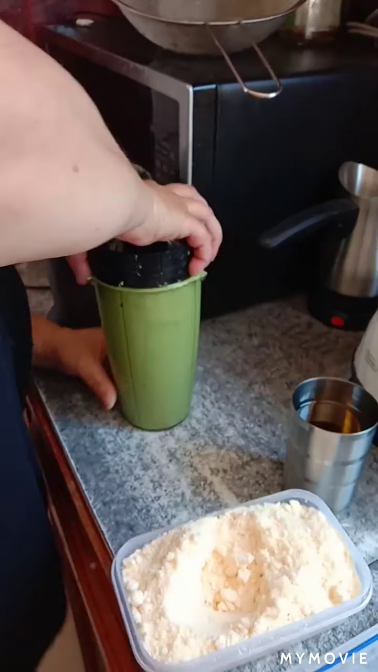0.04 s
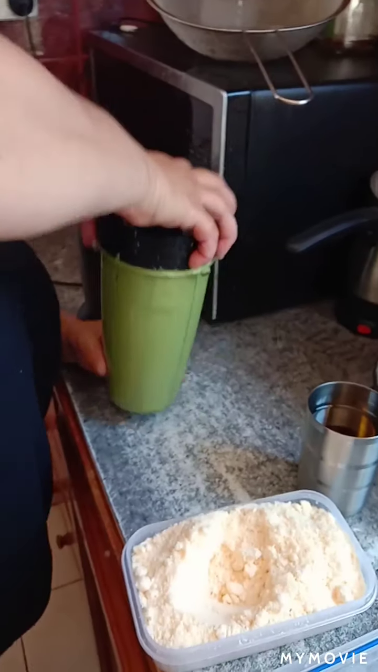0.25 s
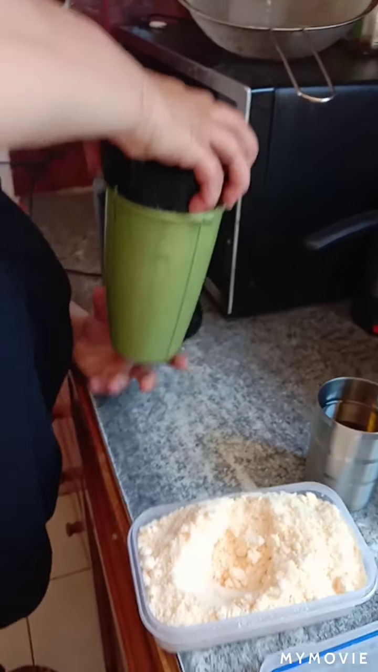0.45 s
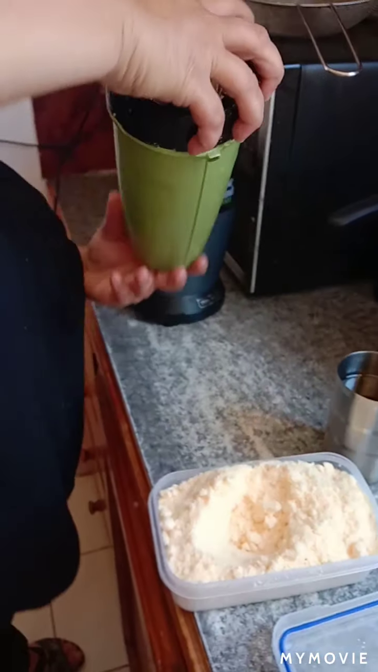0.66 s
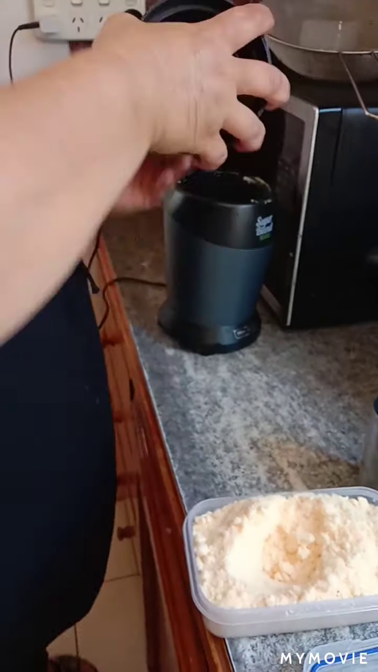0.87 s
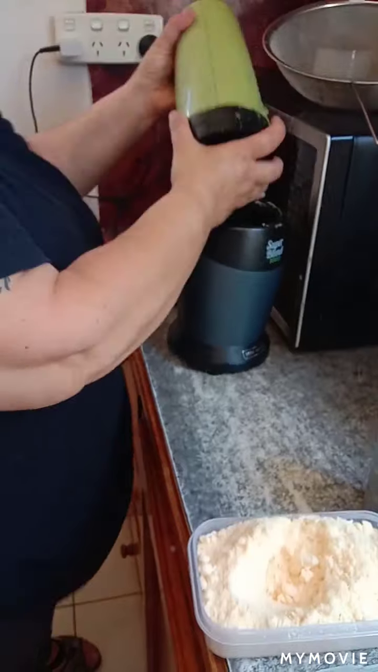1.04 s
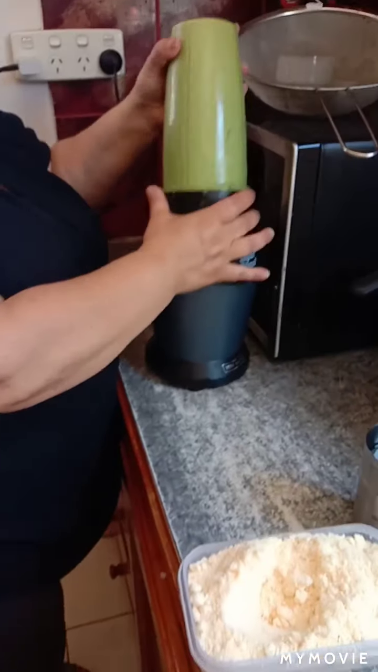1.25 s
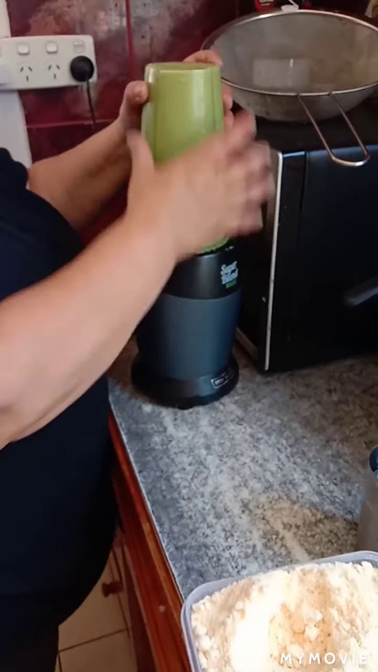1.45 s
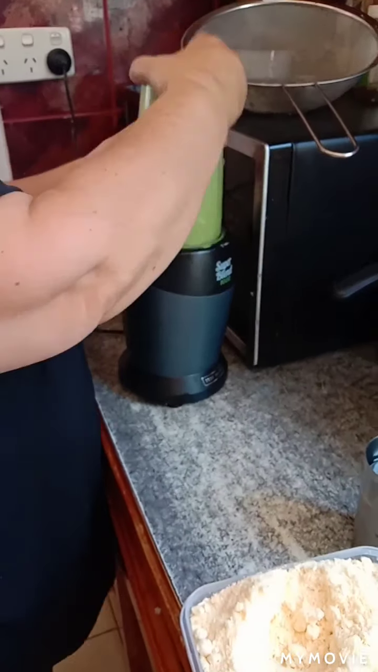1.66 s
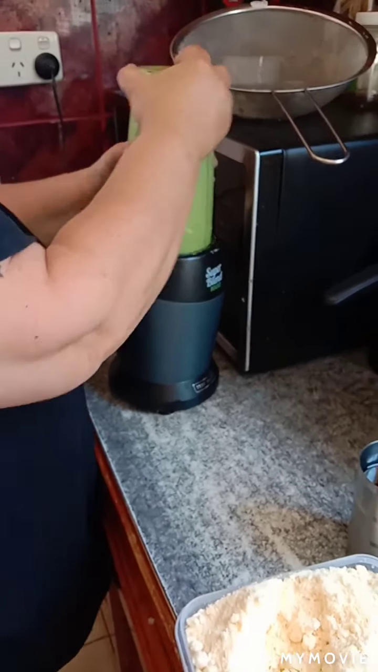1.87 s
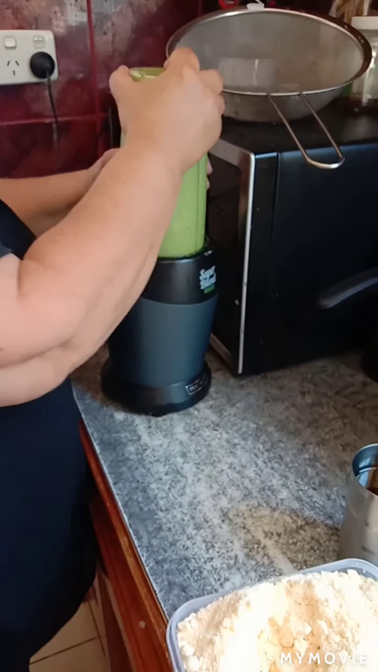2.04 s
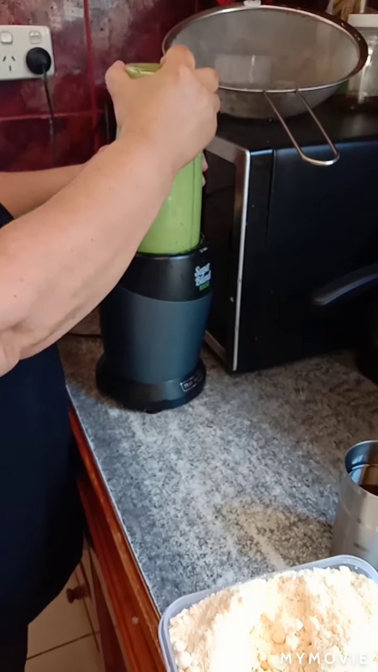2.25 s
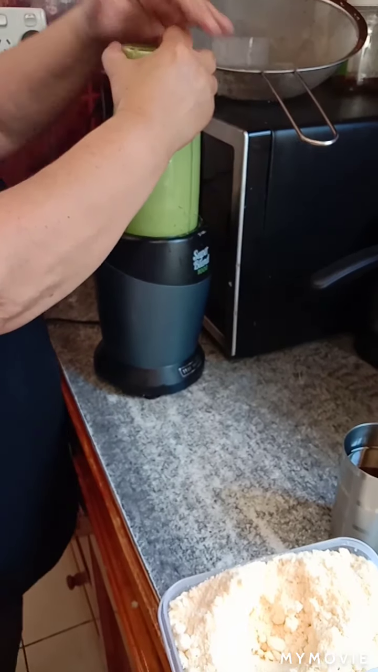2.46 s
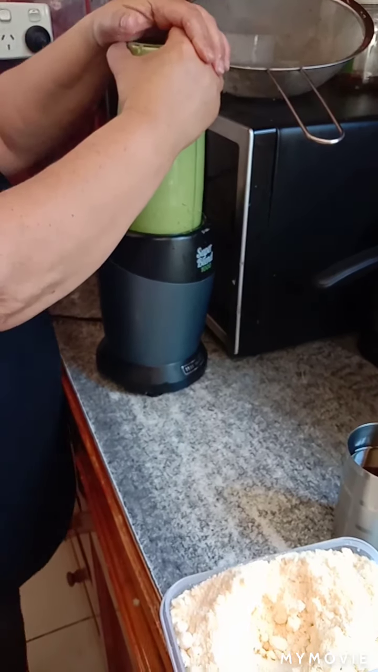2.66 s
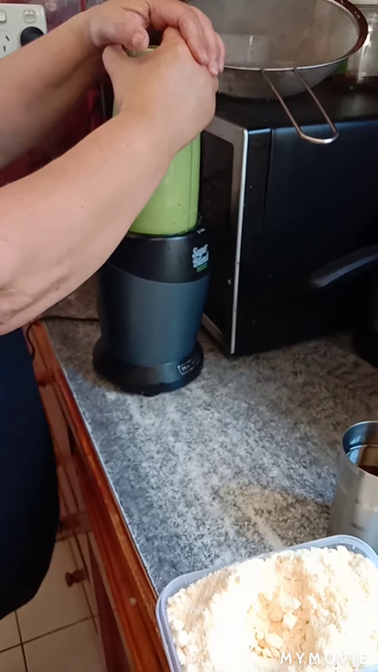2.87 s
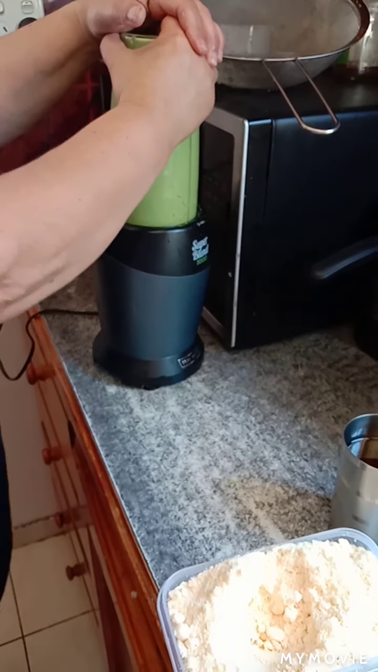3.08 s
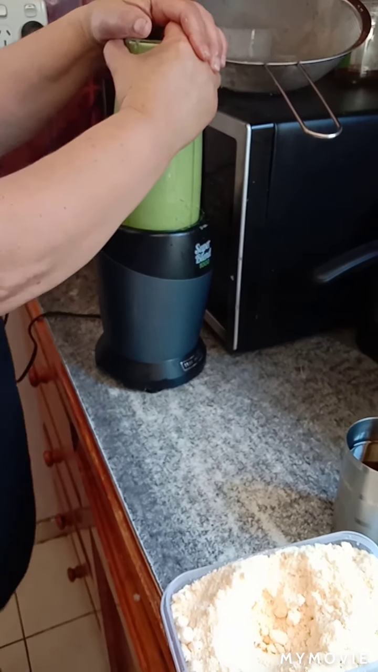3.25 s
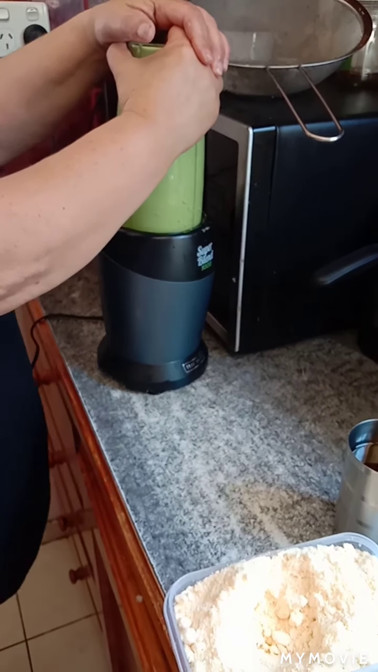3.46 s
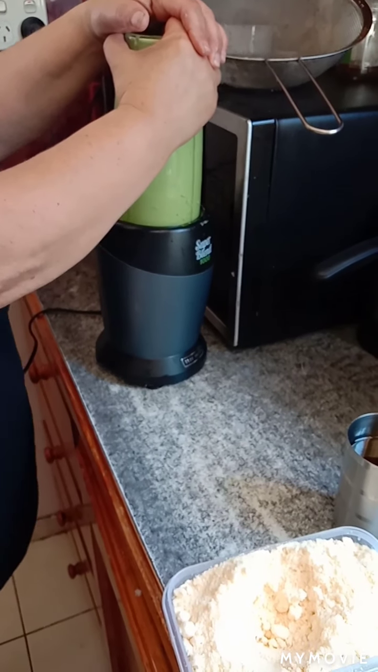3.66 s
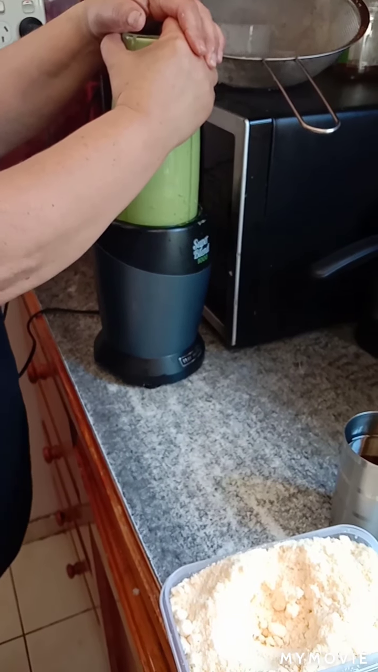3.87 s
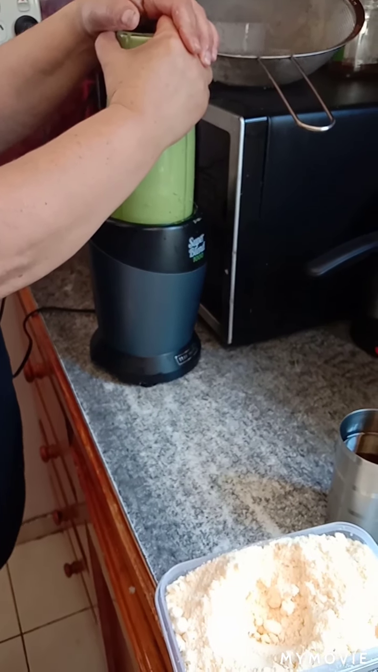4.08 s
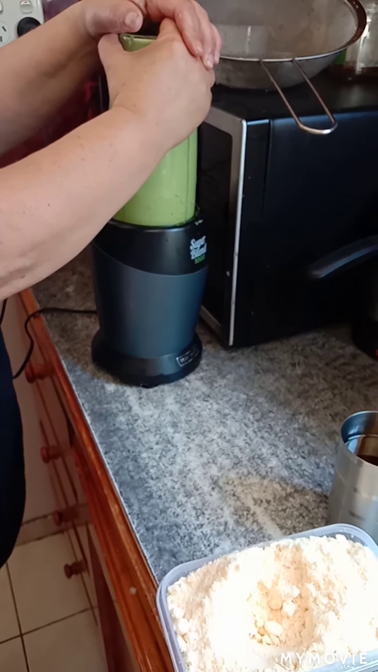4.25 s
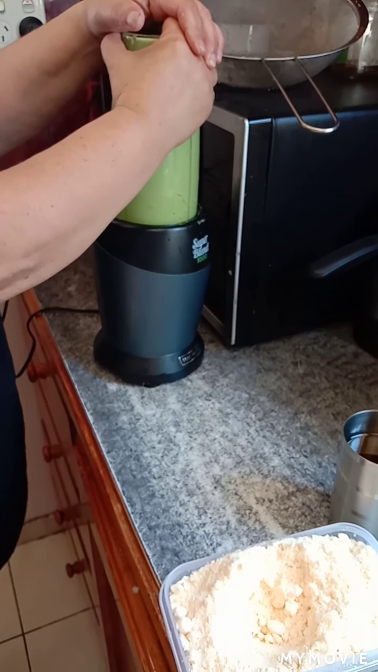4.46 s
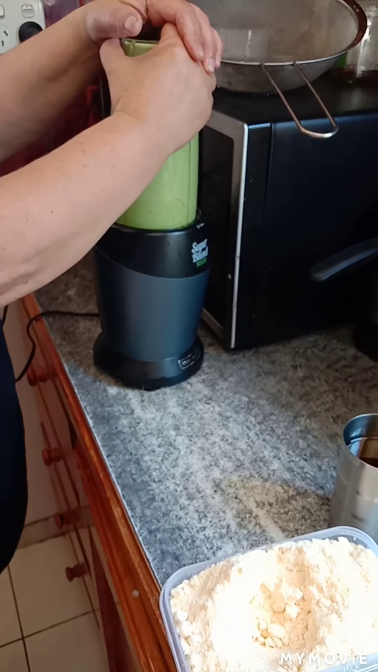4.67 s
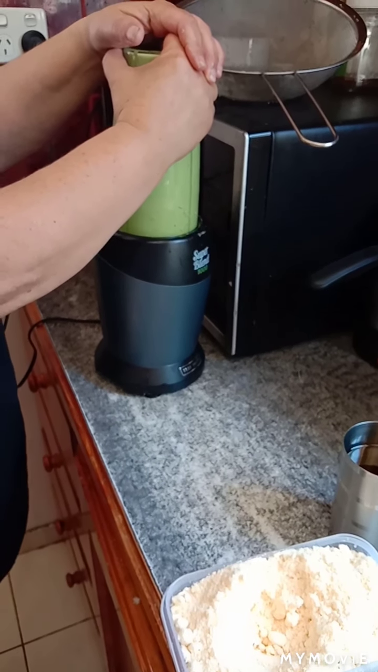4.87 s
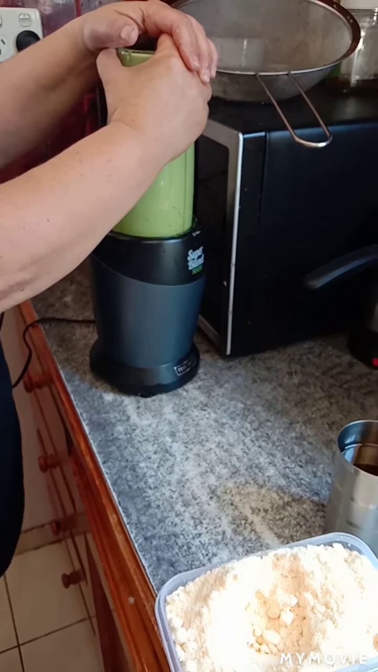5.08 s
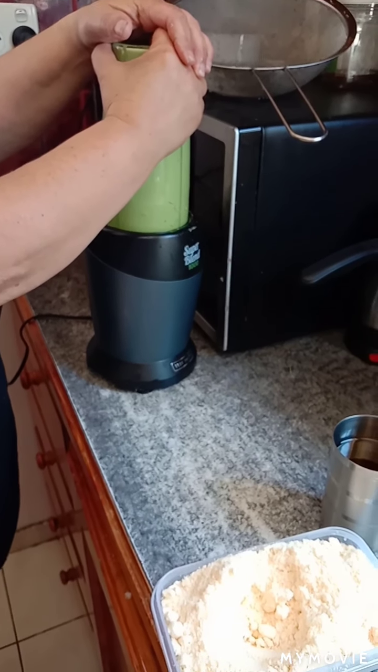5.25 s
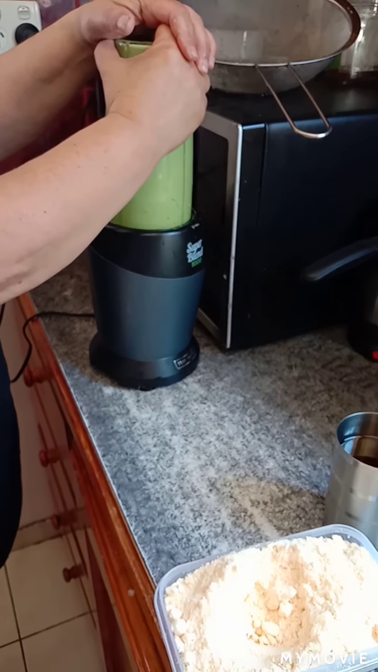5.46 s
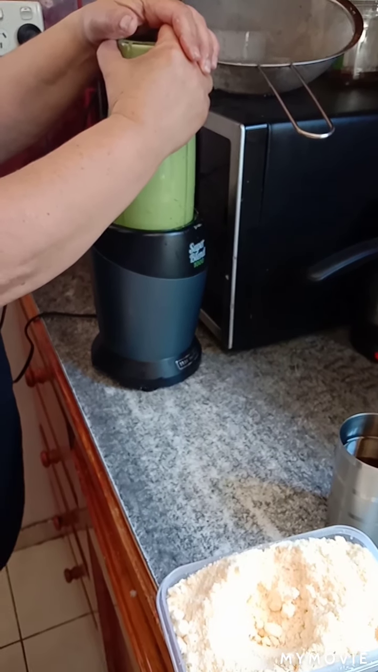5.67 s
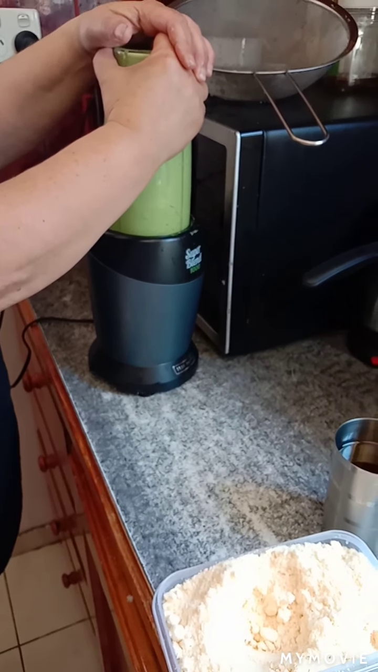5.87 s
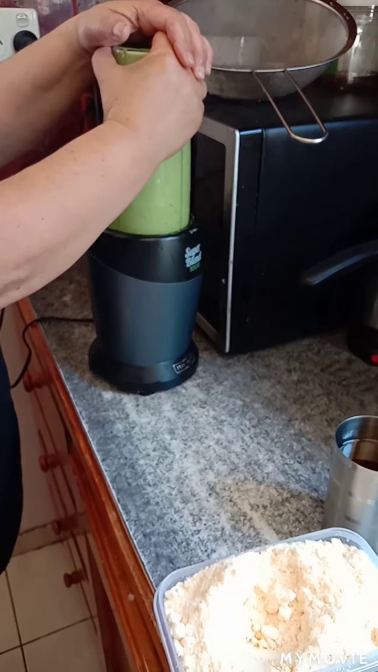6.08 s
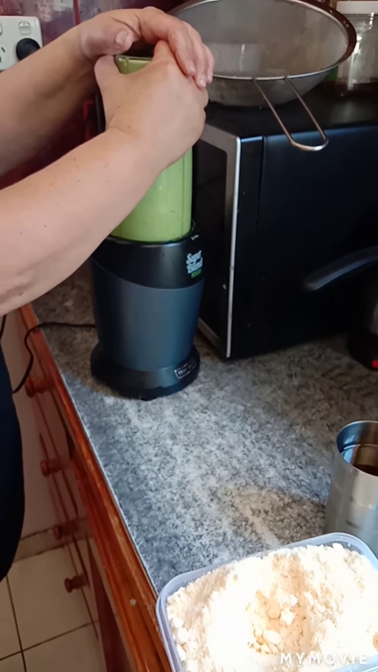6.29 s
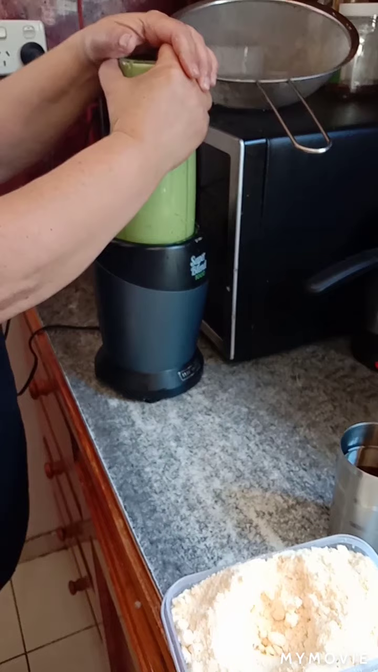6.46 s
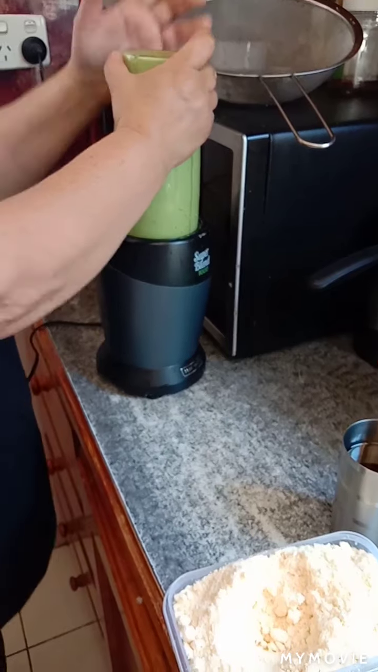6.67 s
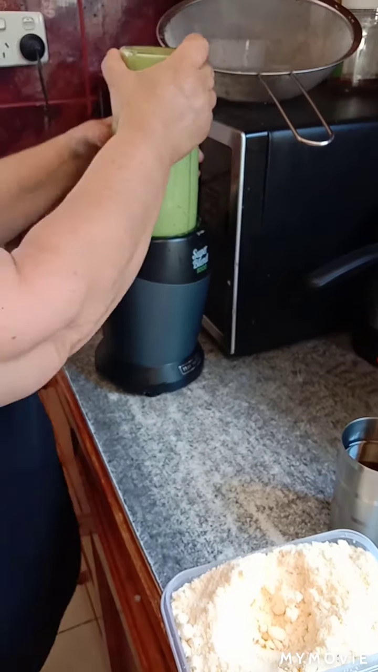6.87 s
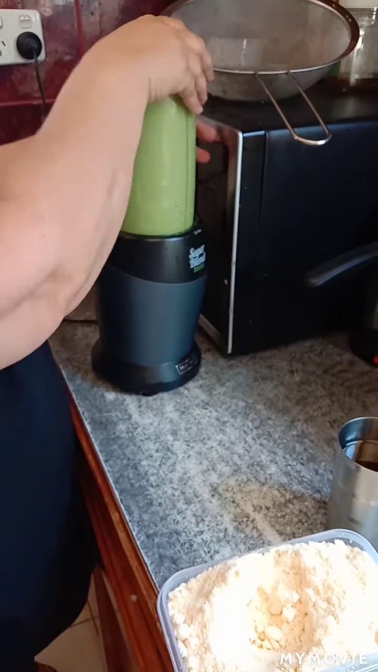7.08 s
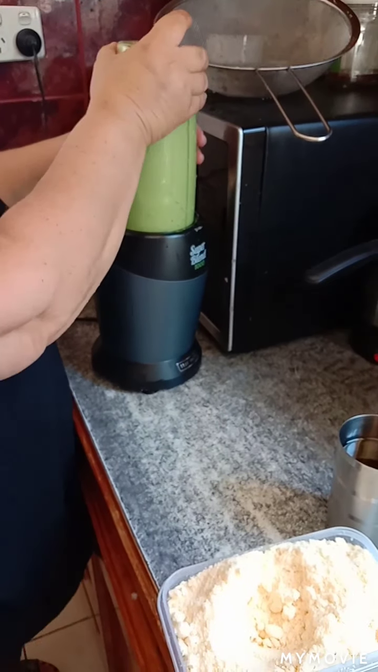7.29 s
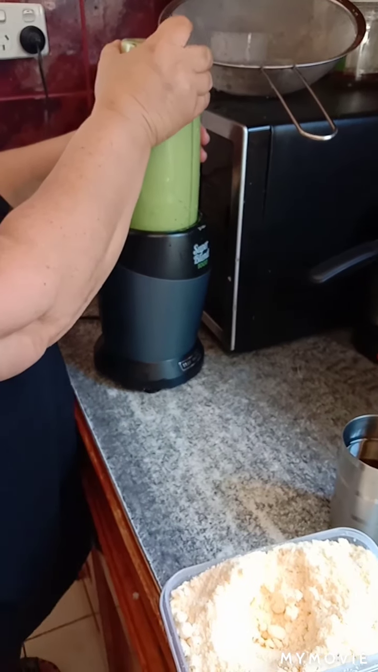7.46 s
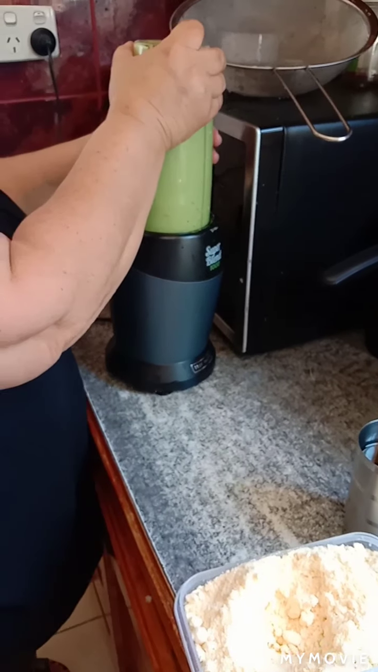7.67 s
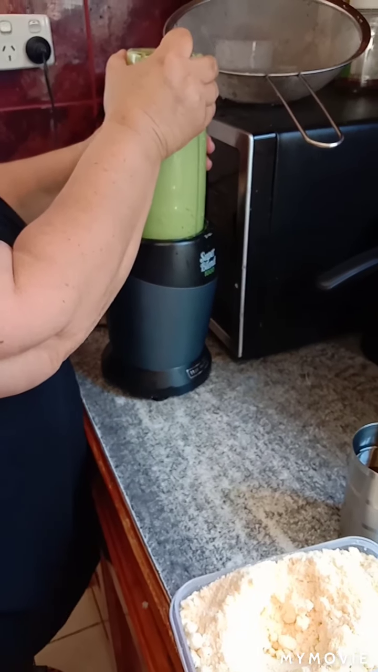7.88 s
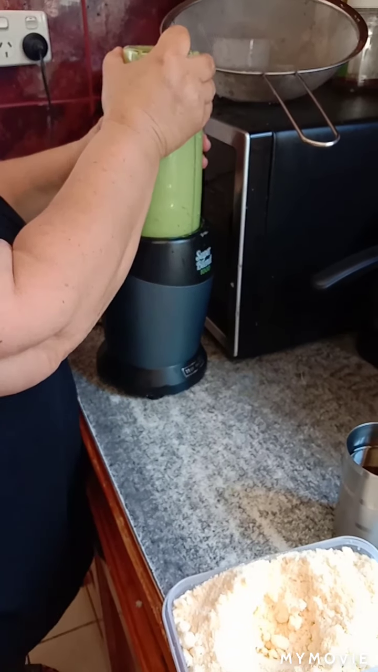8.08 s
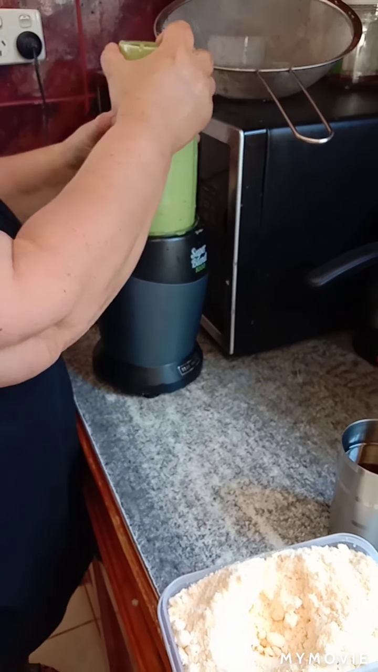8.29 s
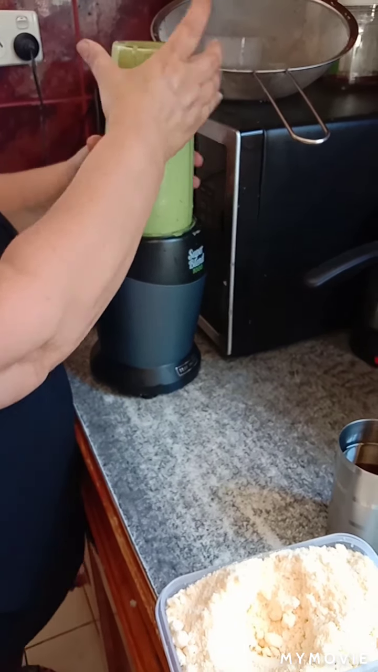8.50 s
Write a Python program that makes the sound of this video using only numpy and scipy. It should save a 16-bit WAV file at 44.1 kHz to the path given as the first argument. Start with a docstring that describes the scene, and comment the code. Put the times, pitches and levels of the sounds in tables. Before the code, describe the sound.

Close up at a kitchen counter: very quiet plastic friction and faint clicks, a pause, then several dull knocks as a filled cup is seated on a blender. The blender kicks in abruptly with a rising groan and runs for about six seconds, a harsh buzzing roar with steady whine, gurgling slosh and a breathy whistle that comes and goes. It drops off just before the end, with short room reflections.

```python
"""Friction first grumbles at the lid; then a cup of food is knocked onto a small blender base in a kitchen.
The handling is friction noise and struck damped modes. The motor spins up: a whine at a multiple of the
shaft rate wavers with the load, blades churn the food as noise through the resonances of cup and housing,
and narrow modes sing and whistle. At the end the cup is released and the motor coasts.
Diffuse reflections and a quiet, faintly humming kitchen surround it all."""
import sys
import numpy as np
from scipy import signal
from scipy.fft import rfft, irfft
from scipy.io import wavfile

SR = 44100
rng = np.random.default_rng(int(sys.argv[2]) if len(sys.argv) > 2 else 0)


def generate_wav(signal):
    """Clip the signal to [-1, 1] and save it as 16-bit WAV at the path in sys.argv[1]."""
    frames = np.transpose(np.atleast_2d(signal))
    scaled = np.clip(frames, -1, 1) * 32767
    pcm = np.round(scaled).astype(np.int16)
    wavfile.write(sys.argv[1], SR, pcm)


N = 376173
TIME, HZ = np.arange(N) / SR, np.fft.rfftfreq(N, 1 / SR)


def gain_of(db):
    """Level to amplitude: 20 dB is a factor of ten."""
    return 10 ** (np.asarray(db) / 20)


def evened(x):
    """Normalisation to an rms of 1."""
    return x / np.sqrt(np.mean(x ** 2) + 1e-20)


def read(points, hz):
    """Interpolation of a spectrum table on a logarithmic frequency axis."""
    f, value = np.transpose(points)
    return np.interp(np.log(hz + 1), np.log(f + 1), value)


def curves(rows):
    """Linear interpolation in time: each column of a table at every sample."""
    s, *columns = np.transpose(rows)
    return [np.interp(TIME, s, column) for column in columns]


def add(mix, s, sound):
    """Superposition of a sound at time s."""
    part = mix[round(s * SR):][:len(sound)]
    part += sound[:len(part)]


def swell(middle, length):
    """Raised-cosine envelope: a smooth rise and fall of height 1."""
    return np.cos(np.pi * np.clip((TIME - middle) / length, -.5, .5)) ** 2


def noise(gain):
    """Spectral shaping: white noise filtered by a gain at each frequency, rms 1."""
    return evened(irfft(rfft(rng.standard_normal(N)) * gain, N))


def wander(rate_hz):
    """Low-passed noise: slow chance fluctuation of rms 1 up to about the given rate."""
    return noise(1 / (1 + (HZ / rate_hz) ** 4))


def resonance(hz, width):
    """Resonance filtering: broadband turbulence excites one narrow mode."""
    return noise(1 / (1 + (2 * (HZ - hz) / width) ** 2))


START_S, SPIN_UP_S = 1.996, 0.067  # switch-on and time constant of the run-up
RELEASE_S, COAST_S = 8.295, .3  # release of the cup and time constant of coasting


def speed():
    """Exponential relaxation: the shaft's share of running speed nears 1, then decays after release."""
    run_up = 1 - np.exp(-np.maximum(TIME - START_S, 0) / SPIN_UP_S)
    return run_up * np.exp(-np.maximum(TIME - RELEASE_S, 0) / COAST_S)


WHINE_ORDER = 12  # multiple of the shaft rate
# pitch of the whine at full speed, under the changing load: t/s, f/Hz
WHINE_PITCH = [(2.25, 2362), (2.36, 2348), (3.08, 2345), (3.17, 2375), (3.32, 2343), (3.87, 2366),
               (4.08, 2339), (4.32, 2368), (4.53, 2337), (4.85, 2362), (4.95, 2345), (5.1, 2361),
               (5.53, 2343), (5.69, 2358), (5.81, 2349), (5.96, 2370), (6.21, 2319), (6.35, 2352),
               (6.48, 2330), (6.74, 2335), (6.85, 2319), (7.02, 2351), (7.38, 2358), (7.46, 2319),
               (7.69, 2358), (7.93, 2342), (7.95, 2307), (8.14, 2312), (8.17, 2354), (8.3, 2318)]
# strength of the whine, before the common offset: t/s, relative level/dB
WHINE_LEVEL = [(2.5, -35), (3.1, -31), (4.0, -28), (5.9, -28.5), (6.15, -31.5), (6.6, -31), (7.2, -36),
               (7.5, -32), (8.3, -31.5)]
# weaker tones of the motor at full speed: multiple of the shaft rate, mean level/dB
OVERTONES = [(16, -46), (24, -51), (36, -58), (48, -70)]
# shaking of the base near a critical shaft speed: multiple of the shaft rate, mean peak level/dB
SHAFT_ORDERS = [(1, -40), (2, -42), (3, -32.5), (6, -39.5)]
CRITICAL_SHARE, CRITICAL_WIDTH = 0.72, 0.14  # as shares of running speed


def motor(whine_db=1.0, overtones_waver_db=3.5, whine_law_db=70., shake_rough_db=3.5):
    """Rotational harmonics: tones at multiples of the shaft rate; a critical speed shakes the base."""
    share = speed()
    shaft_hz = share * curves(WHINE_PITCH)[0] / WHINE_ORDER
    shiver = 1 + .0012 * wander(20)
    angle = 2 * np.pi * np.cumsum(shaft_hz * shiver) / SR
    whine_level = curves(WHINE_LEVEL)[0] + whine_db + .5 * wander(14)
    whine = gain_of(whine_level) * np.sin(WHINE_ORDER * angle)
    overtones = sum(gain_of(db + overtones_waver_db * wander(9.5)) * np.sin(order * angle)
                    for order, db in OVERTONES)
    speed_gain = gain_of(whine_law_db * np.log10(share + 1e-9))  # dB per tenfold speed
    # passed on the way up and again, if slow enough, on the way down
    critical = np.exp(-((share - CRITICAL_SHARE) / CRITICAL_WIDTH) ** 2)
    critical = critical * gain_of(shake_rough_db * wander(60))
    shake = sum(gain_of(db) * np.sin(order * angle) for order, db in SHAFT_ORDERS)
    return np.sqrt(2) * ((whine + overtones) * speed_gain + critical * shake)


# resonances of cup, food and housing under the blades: f/Hz, width/Hz, relative level/dB
BODY = [(119, 79, -14), (192.6, 73, -3.5), (302, 91, -7.5), (391.3, 100, -1.5), (466, 137, -12),
        (796, 460, -14.5), (1062.6, 72, -0.5), (1244, 137, -1.5), (1360, 160, -13), (1683, 434, -7),
        (2030, 264, -2.5), (2350, 450, -2), (2814, 210, -3), (3213, 910, -5), (3380, 990, -7.5),
        (4720, 240, -18.5), (5310, 1660, -17.5), (6640, 380, -19.5), (7010, 217, -21.5), (7370, 790, -22),
        (9150, 2730, -25.5), (11140, 2138, -34.4), (15000, 1500, -29.5)]


def response(hz, lo=0, hi=SR):
    """Energy sum of modes: gain at hz of the body resonances centred between lo and hi."""
    power = sum(gain_of(db) ** 2 / (1 + (2 * (hz - centre) / width) ** 2) ** 2
                for centre, width, db in BODY if lo <= centre < hi)
    radiation = (hz ** 2 / (hz ** 2 + 55 ** 2)) ** 2  # so small a body radiates little bass
    return np.sqrt(power) * radiation


def body(lo, hi):
    """Forced resonance: turbulence rings the body modes between lo and hi."""
    return noise(response(HZ, lo, hi))


# the food moving in the cup, before common offsets: t/s, deep slosh level/dB, hollow boom level/dB
SLOSH = [(2.1, -38, -33.5), (3.1, -39, -36), (4.1, -41.5, -35.5), (4.8, -44, -36), (6.4, -44.5, -34.5),
         (6.85, -39.5, -33.5), (7.7, -40, -34), (8.25, -36, -35.5), (8.42, -41, -30), (8.53, -49, -45)]
# lumps that drop into the blades: t/s, peak level/dB
LUMPS = [(2.76, -43), (3.16, -40), (3.69, -39), (4.07, -39), (7.44, -38)]
LUMP_S = 0.1  # length of each lump's burst
BITE_S, BITE_LENGTH_S = 2.058, 0.072  # blades first bite the resting food: middle and length
WALL_DB, RASP_DB, SPRAY_DB = -32, -24.5, -34.5  # starting levels, referred to full speed
CHURN_LAW_DB, SPRAY_LAW_DB = 15, 34  # dB per tenfold speed
SPRAY_BUILD_S, SPRAY_EASE_DB_PER_S = 0.11, 0.22  # thrown food builds spray, which eases as it turns smooth


def churn(flutter=0.12, surge_db=0.6, slosh_db=-0.5, boom_db=0.0, bite_rasp_db=-37.0,
          bite_slosh_db=-39.0, spatter_db=0.3):
    """Turbulent excitation: blades drive slosh, boom, cup wall, rasp and spray as bands of body modes."""
    slosh, boom = curves(SLOSH)
    deep, hollow, ring = body(0, 250), body(250, 600), body(600, 1500)
    rasp, spray = body(1500, 4200), body(4200, SR)
    decades = np.log10(speed() + 1e-9)
    running = np.maximum(TIME - START_S, 0)
    bite = swell(BITE_S, BITE_LENGTH_S)
    lumps = sum(gain_of(db) * swell(s, LUMP_S) for s, db in LUMPS)
    lumps = lumps + gain_of(bite_slosh_db) * bite

    rasp_gain = gain_of(RASP_DB + CHURN_LAW_DB * decades) + gain_of(bite_rasp_db) * bite
    thrown = 1 - np.exp(-running / SPRAY_BUILD_S)
    spray_level = SPRAY_DB - SPRAY_EASE_DB_PER_S * running + SPRAY_LAW_DB * decades
    spray_gain = thrown * gain_of(spray_level + spatter_db * wander(12))
    bright = rasp_gain * rasp + spray_gain * spray

    dark = (gain_of(slosh + slosh_db) + lumps) * deep
    dark = dark + gain_of(boom + boom_db) * hollow
    dark = dark + gain_of(WALL_DB + CHURN_LAW_DB * decades) * ring

    # Hz; slight, steady flutter in the level of the bright noise
    level_flutter = 1 + flutter * np.sin(2 * np.pi * 46.87 * TIME)
    switched_on = np.clip(running / 0.0069, 0, 1)
    return switched_on * (dark + bright * level_flutter * gain_of(surge_db * wander(35)))


# narrow mode of the cup wall as the food presses on it: t/s, level/dB
SINGING = [(2.3, -39), (3.6, -34.5), (4.2, -40.5), (5.5, -36.5), (6.95, -38), (7.08, -29), (7.25, -31),
           (8.25, -40), (8.5, -41)]
# fuzzy whistle of the housing coming and going: t/s, relative level/dB
WHISTLE = [(2.1, -47), (2.5, -32), (3.15, -37), (3.4, -59), (5.85, -37.5), (6.8, -34), (8.5, -50)]
# two narrow modes of the housing that whistle: f/Hz, width/Hz, relative level/dB
WHISTLE_MODES = [(2775, 80, -3), (3153, 120, 0)]


def singing(wall_hz=1233.0, wall_width=41.0, bite_db=-27.):
    """Narrow-band resonance: lightly damped modes of cup and housing swell out of the churning."""
    wall_gain = gain_of(curves(SINGING)[0]) + gain_of(bite_db) * swell(BITE_S, BITE_LENGTH_S)
    wall = wall_gain * resonance(wall_hz, wall_width)
    pair = sum(gain_of(db) * resonance(hz, width) for hz, width, db in WHISTLE_MODES)
    whistle = gain_of(curves(WHISTLE)[0]) * pair
    return (wall + whistle) * np.minimum(2 * speed(), 1)  # full from half speed


# base and cup groan as the motor kicks and first flings the food round:
# middle t/s, length/s, f/Hz at the middle, rise/(Hz/s), peak level/dB
GROANS = [(2.012, .046, 115, 500, -26.5), (2.077, .085, 358, 600, -22.5), (2.168, .06, 176, 40, -27)]


def groans():
    """Frequency glide: short rising tones of base and cup, phase being the integral of frequency."""
    out = np.zeros(N)
    for s, length, hz, rise, db in GROANS:
        phase = 2 * np.pi * np.cumsum(hz + rise * (TIME - s)) / SR
        out += gain_of(db) * swell(s, length) * np.sin(phase)
    return np.sqrt(2) * out


def ringing(modes, t):
    """Modal decay: damped modes whose levels vary by chance, as each blow lands elsewhere."""
    return sum(gain_of(db + 2 * rng.standard_normal() - 60 * t / t60) * np.sin(2 * np.pi * hz * t)
               for hz, db, t60 in modes)


# knocks of cup or hand: t/s, then relative level/dB of base thump, cup boom, plastic clack, scrape
# and bounces, then rise/s
KNOCKS = [ (.293, -63, -55, -65, -71, -5, .0035), (0.4, -62, -74, -56, -57.5, -17, 0.0031),
          (1.093, -71, -58, -70, -87, -9, .004), (1.216, -65, -73, -66, -88, -10, 0.0023),
          (1.354, -45, -48, -48, -68, -10, 0.0033), (1.364, -38, -43, -45, -65, -13, .003),
          (1.408, -32.5, -32, -38.5, -74, -5, 0.0034), (1.493, -31, -25.5, -40, -59.5, -3.5, 0.0043),
          (1.679, -51, -40, -58, -66, -12, 0.0095), (1.747, -38, -31.5, -52, -60, -7, 0.0057),
          (1.765, -34, -34, -35, -52, -18, 0.0029), (1.776, -26.5, -44, -49, -60, -21, 0.0017),
          (1.838, -36, -33.5, -41.5, -58, -10, 0.0011), (1.956, -46, -35.5, -53.5, -79, -11, .008),
          (2.001, -42, -39, -38, -41, -0.5, .009)]
# the cup lands, catches with its other edge and rocks back: delay/s, relative level/dB
BOUNCES = [(0.0104, -5.5), (.034, -15)]
# ringing of the base on the counter: f/Hz, mean relative level/dB, t60/s
BASE_MODES = [(125, 1, 0.093), (174, 5, 0.097), (206.5, -2, 0.18)]
# ringing of the filled cup: f/Hz, mean relative level/dB, t60/s
CUP_MODES = [(290, -2, 0.079), (368.4, 9.5, 0.044), (421, 4, 0.033)]
# ringing of the plastic shell, also rubbed below: f/Hz, relative level/dB, t60/s
SHELL_MODES = [(604, -4, 0.23), (820, -6, .12), (1100, -13, 0.14), (1280, 11, 0.085), (1640, 4, 0.064),
               (2020, 2, 0.093), (2360, -5, .11), (2760, -8, 0.085), (3380, -2, 0.18), (3520, -13, 0.15)]
# colour of plastic on plastic: f/Hz, relative level/dB
CLACK = [(100, -23), (450, -5), (800, 1.5), (1000, -8), (1260, 4.5), (1500, -9), (2000, -1), (2500, -4),
         (3000, -2), (3700, -8.5), (4500, -21), (6000, -30), (9000, -60)]
# colour of plastic scraping: f/Hz, relative level/dB
SCRAPE = [(2000, -30), (4500, 9), (7000, 4), (10000, 0.5), (13000, -17), (15200, -9)]
CONTACT_S = .007  # decay constant of the contact noise


def knocks(thump_db=0., boom_db=0., clack_db=4.0, shell_db=-5.5, scrape_db=0., low_cut_hz=68.0):
    """Impact excitation: contacts and bounces ring base, cup and shell, with a burst of contact noise."""
    out, t = np.zeros(N), np.arange(SR // 3) / SR
    chatter = noise(gain_of(read(CLACK, HZ)))
    grit = noise(gain_of(read(SCRAPE, HZ)))
    for start, thump, boom, clack, scrape, bounce, rise_s in KNOCKS:
        rise = 1 - np.exp(-(t / rise_s) ** 2)
        hits = [(start, 1)] + [(start + delay, gain_of(db + bounce)) for delay, db in BOUNCES]
        for s, force in hits:
            shapes = [rise * ringing(modes, t) for modes in (BASE_MODES, CUP_MODES, SHELL_MODES)]
            shapes.append(np.sqrt(rise) * np.exp(-t / CONTACT_S))
            # each shape is scaled to its rms over the attack
            base, cup, shell, burst = (force * v / np.sqrt(np.mean(v[:SR // 80] ** 2)) for v in shapes)
            here = slice(round(s * SR), round(s * SR) + len(t))
            rough = gain_of(clack + clack_db) * chatter[here] + gain_of(scrape + scrape_db) * grit[here]
            add(out, s, gain_of(thump + thump_db) * base)
            add(out, s, gain_of(boom + boom_db) * cup)
            add(out, s, gain_of(clack + shell_db) * shell)
            add(out, s, burst * rough)
    return signal.sosfilt(signal.butter(2, low_cut_hz, "highpass", fs=SR, output="sos"), out)


# the lid is screwed tight, and the cup is shifted in the hand:
# middle t/s, length/s, peak grumble level/dB, peak shell squeak level/dB
RUBBING = [(.03, 0.3, -62, -68), (.19, 0.26, -64, -63), (.33, .08, -68, -66), (1.29, .14, -63, -78)]


def rubbing(cup_hz=376., cup_width=120.0, shell_width=130., tilt_db=8.0):
    """Friction excitation: rubbing noise grumbles in the cup's hollow and rings its plastic shell."""
    hollow = resonance(cup_hz, cup_width)
    # friction favours the higher modes, by tilt_db per octave
    shell = evened(sum(gain_of(db + tilt_db * np.log2(hz / 1000)) * resonance(hz, shell_width)
                       for hz, db, t60 in SHELL_MODES))
    return sum(swell(s, length) * (gain_of(grumble) * hollow + gain_of(squeak) * shell)
               for s, length, grumble, squeak in RUBBING)


# kitchen reverberation: f/Hz, t60/s
KITCHEN = [(150, 0.26), (500, 0.18), (1300, 0.23), (3500, 0.17), (9000, 0.29)]


def kitchen(x, delay=0.011):
    """Diffuse reverberation: dense reflections from counter and tiles, each band with its own decay."""
    hz, t, z = signal.stft(rng.standard_normal(SR // 2), SR, nperseg=256)
    decay = gain_of(-60 * t / read(KITCHEN, hz)[:, None])
    tail = signal.istft(z * decay, SR, nperseg=256)[1]
    tail = tail * np.clip(np.arange(len(tail)) / SR / delay, 0, 1) ** 2  # reflections build up over delay
    return signal.fftconvolve(x, tail / np.linalg.norm(tail))[:N]


# colour of the quiet kitchen's air: f/Hz, relative level/dB
AIR = [(25, -14), (50, -6), (120, -3), (350, -3), (600, -11), (1100, -12), (1270, -5), (1450, -13),
       (3000, -13), (4500, -24), (8000, -30), (13000, -40), (15300, -35)]
AIR_DB = -61.5  # mean level


def room_tone(hum_db=-69., hum_hz=117.0, drift_db=1.):
    """Stationary background: drifting broadband air noise and the faint sine hum of an appliance."""
    air = gain_of(AIR_DB + drift_db * wander(11)) * noise(gain_of(read(AIR, HZ)))
    hum = np.sqrt(2) * np.sin(2 * np.pi * hum_hz * TIME) * gain_of(2 * wander(5))
    return air + gain_of(hum_db) * hum


def scene(knock_wet_db=-4.0, churn_wet_db=-17):
    """Superposition: handling and blender, direct and reflected, over the quiet of the kitchen."""
    handling = rubbing() + knocks() + groans()
    blending = churn() + singing()
    reflections = kitchen(gain_of(knock_wet_db) * handling + gain_of(churn_wet_db) * blending)
    return (motor() + blending + handling + reflections + room_tone())[None]


def record(dry, edge_hz=15560):
    """Band limitation: a steep linear-phase low-pass filter removes the extreme treble."""
    low_pass = signal.firwin(1023, edge_hz, window=("kaiser", 9), fs=SR)
    return signal.oaconvolve(dry, low_pass[None], "same")


dry = scene()
out = record(dry)
generate_wav(out)
```